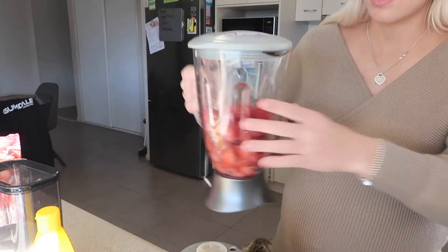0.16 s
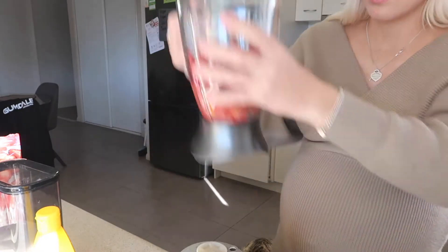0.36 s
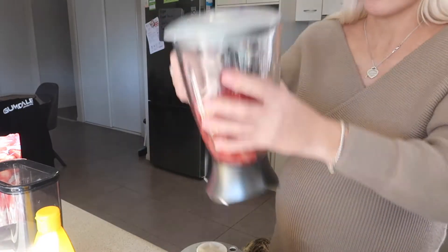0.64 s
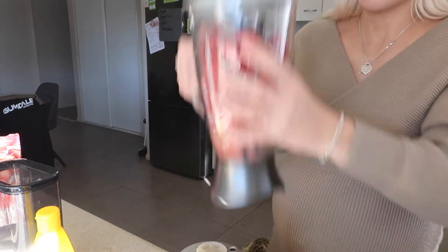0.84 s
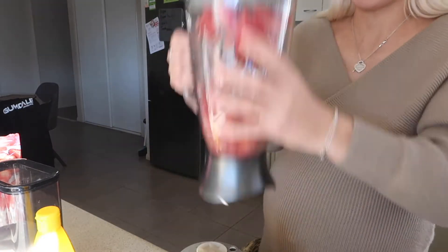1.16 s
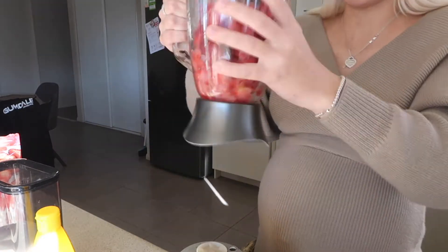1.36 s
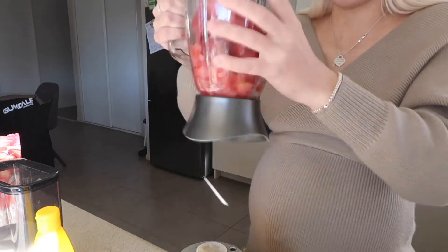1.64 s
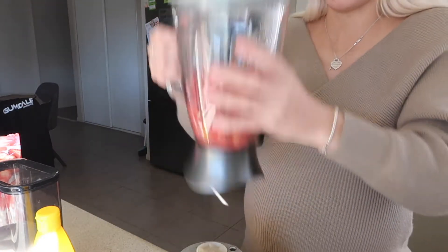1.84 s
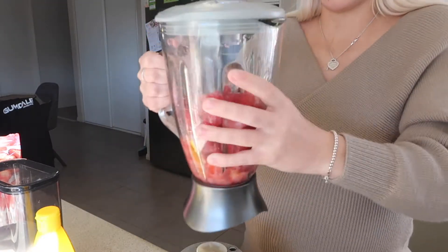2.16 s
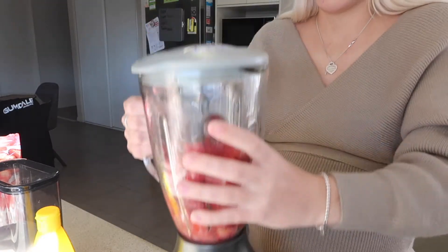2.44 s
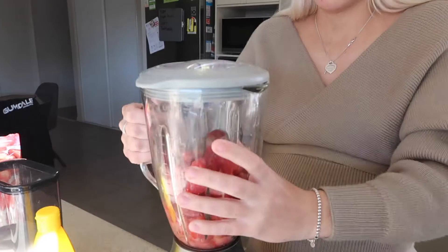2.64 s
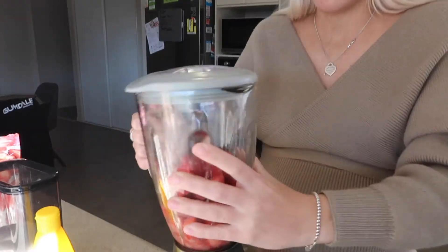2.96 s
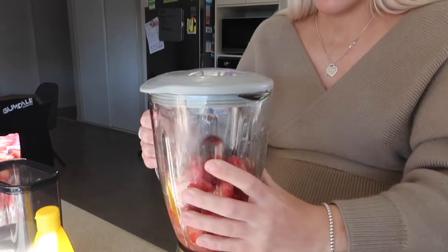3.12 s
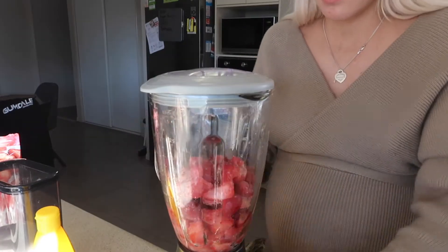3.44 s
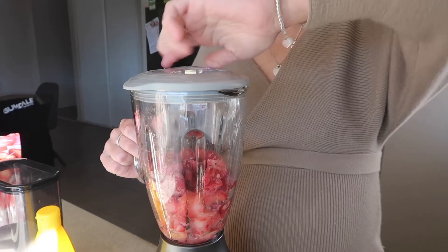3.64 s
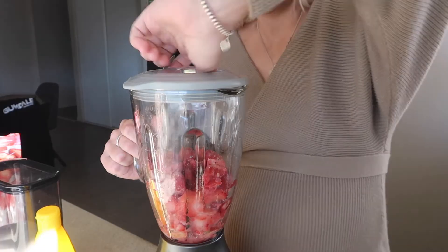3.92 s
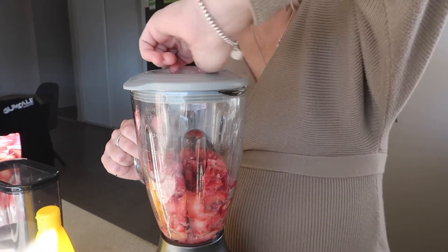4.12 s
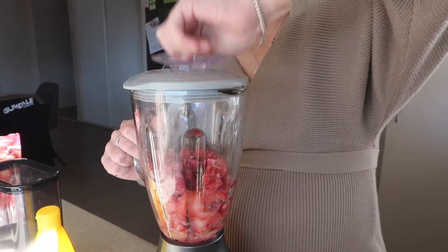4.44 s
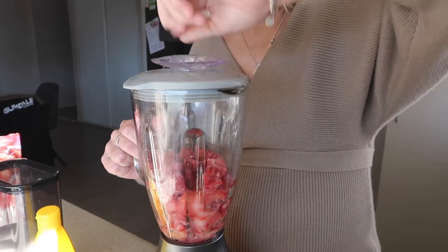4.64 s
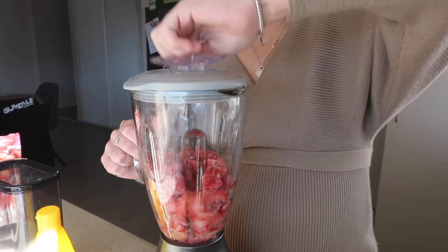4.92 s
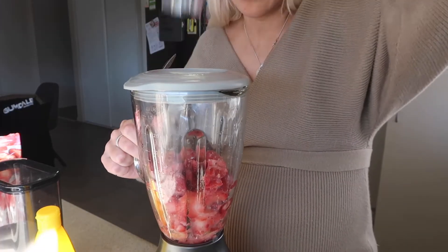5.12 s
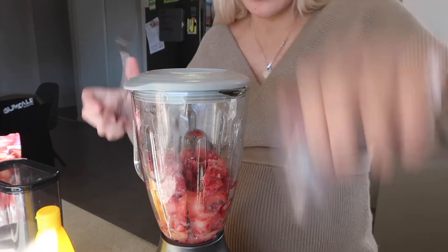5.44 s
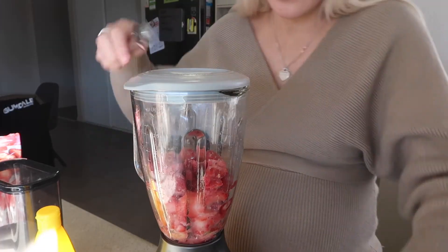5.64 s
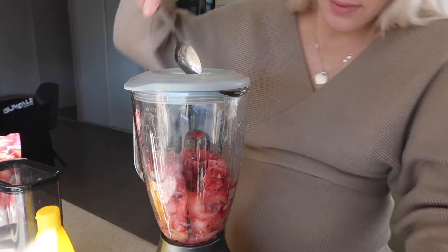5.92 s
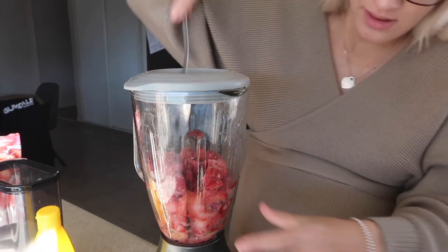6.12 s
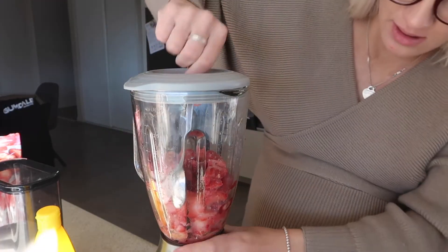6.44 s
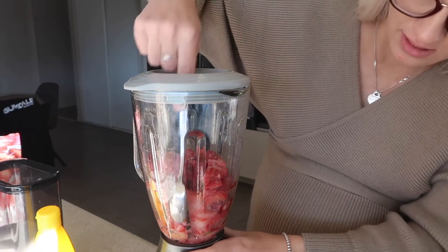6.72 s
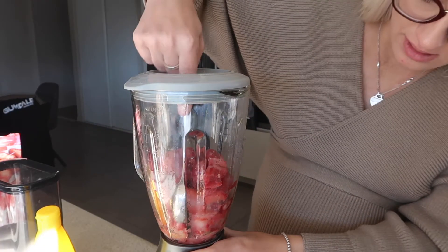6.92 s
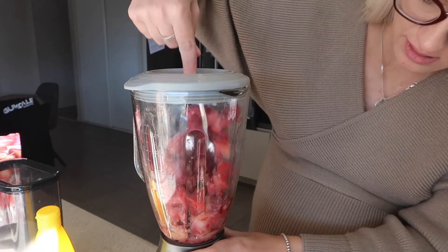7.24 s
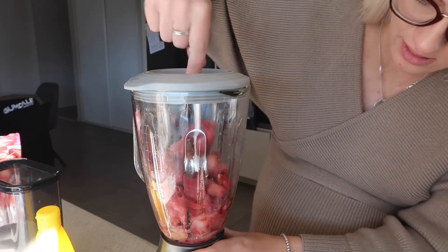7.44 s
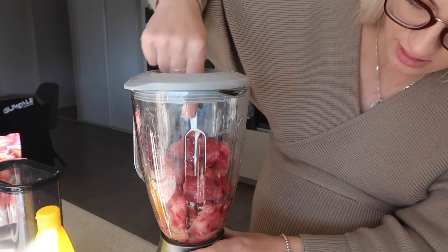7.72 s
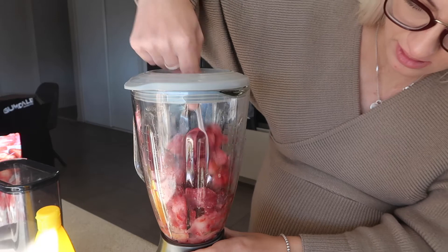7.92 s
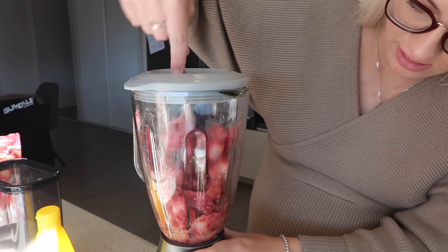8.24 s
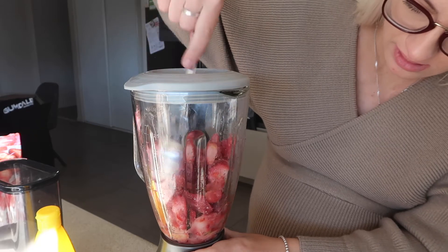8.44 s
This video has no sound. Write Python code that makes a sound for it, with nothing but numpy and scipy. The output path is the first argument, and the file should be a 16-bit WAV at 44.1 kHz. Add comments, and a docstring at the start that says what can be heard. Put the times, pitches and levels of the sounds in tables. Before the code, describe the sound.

A close stereo microphone hears icy lumps crunch and skid in a hollow glass jug, then a heavy double knock as it is seated. Dry plastic rasps and sharp snaps come next as the lid's cap is worked out. After a short pause, a metal spoon taps plastic, tumbles against glass with bright, quickening rattles, and later quietly stirs fruit, ending in thin clinks. Light room echo and faint hiss surround it.

```python
"""A glass blender jug of frozen fruit is shaken, then set down on its base in a kitchen.
The plastic cap is twisted out of the lid; a spoon drops through the hole, then pokes fruit and clinks on glass.
Blows are noisy cracks plus fading sine tones, rubbing is clumped grains of noise, slides are gritty noise.
Hum, rumble and hiss lie underneath, and fading noise makes the echoes of the room."""
import sys
import numpy as np
from scipy import signal
from scipy.fft import rfft, irfft, next_fast_len
from scipy.io import wavfile
from scipy.ndimage import uniform_filter1d

SR = 44100
rng = np.random.default_rng(int(sys.argv[2]) if len(sys.argv) > 2 else 0)


def wrap_up_sound(samples):
    """Save the sound to the file named by the first command line argument, as 16-bit audio."""
    columns = np.atleast_2d(samples).T
    # keep every value between -1 and 1, then stretch to whole-number steps
    tamed = np.clip(columns, -1, 1)
    steps = np.round(tamed * 32767).astype(np.int16)
    wavfile.write(sys.argv[1], SR, steps)


N = 378378
TIME = np.arange(N) / SR
CUTOFF_HZ = 15800   # nearly nothing is heard above this


# Sounds with two rows hold mid (straight ahead) and side (spread to left and right).
# In every table, t60 is the time a tone takes to fade by 60 dB.

def from_db(db):
    """Turn decibels into a gain."""
    return 10 ** (np.asarray(db) / 20)


def rms_one(x):
    """Scale to an rms (average strength) of one."""
    return x / np.sqrt(np.mean(x ** 2) + 1e-20)


def at_hz(points, hz):
    """Read a table between its points, on a logarithmic frequency axis."""
    f, value = np.transpose(points)
    return np.interp(np.log(np.maximum(hz, 1)), np.log(f), value)


def colour(x, points):
    """Make some pitches louder and others softer, along a smooth curve."""
    length = x.shape[-1]
    size = next_fast_len(length + 4096)
    gain = from_db(at_hz(points, np.fft.rfftfreq(size, 1 / SR)))
    return irfft(rfft(x, size) * gain, size)[..., :length]


def band(x, edges, order=2):
    """Keep only the pitches between two edges."""
    return signal.sosfilt(signal.butter(order, edges, "band", fs=SR, output="sos"), x)


def fade(t, t60):
    """Die away exponentially, 60 dB down after t60."""
    return np.exp(-np.log(1000) * t / t60)


def add(out, s, sound):
    """Mix a sound in at a time in seconds."""
    start = max(round(s * SR), 0)
    out[..., start:start + sound.shape[-1]] += sound[..., :max(N - start, 0)]


def grit(shape, depth_db, size=130):
    """Uneven gain of surfaces that catch and let go every few milliseconds."""
    wobble = rms_one(uniform_filter1d(rng.standard_normal(shape), size))
    return from_db(depth_db * np.clip(wobble, -2, 2))


def strokes_level(strokes):
    """Each stroke rises, holds and falls."""
    return sum(from_db(db) * np.interp(TIME, np.cumsum(stages), [0, 1, 1, 0]) for *stages, db in strokes)


def ringing(strikes, modes):
    """Each strike sets the same clear tones ringing, straight ahead."""
    out, t = np.zeros((2, N)), TIME[:SR]
    ring = sum(from_db(db) * np.sin(2 * np.pi * hz * t) * fade(t, t60) for hz, db, t60 in modes)
    for s, db, *_ in strikes:
        add(out[0], s, from_db(db) * ring)
    return out


# The four pitch ranges of a blow: thump, knock, clack and tick. Columns: lowest f/Hz, highest f/Hz.
# A blow's level is that of its clack over the first 20 ms, before any final colouring;
# its thump and knock are given against that level.
BLOW_BANDS = [(110, 600), (600, 1500), (1500, 4000), (4000, 12000)]


def blows(rows, modes, tick_db, tick_growth, crack_db, crack_t60, rattle_db, rattle_t60, scatter_db,
          build_cycles=0.25, contact_hz=600, hardening=0.22, detune=0, grip_db=0, grit_db=2,
          note_db=None, note_t60=None):
    """Each blow is a crack, a short uneven rattle of the body and its clear tones (modes)."""
    rows, t = np.array(rows), np.arange(int(.55 * SR), dtype=np.float32) / SR
    hz, level_db, t60 = np.array(modes).T[:, :, None]
    # a mode takes part of a cycle or more to build up, so the lows swell after the crack
    decays = from_db(level_db) * fade(t, t60) * (1 - np.exp(-hz * t / build_cycles))
    # while it still touches, the body loses grip_db of its ring; the rest dies freely
    decays = decays * from_db(grip_db * (fade(t, .15) - 1))

    # contact point and grip change from blow to blow, and with them each mode's strength, sign and pitch
    rings = []
    for strength, sign, bend in rng.standard_normal((len(rows), 3, 2, len(modes))):
        bent_hz = (hz * (1 + detune * bend[0][:, None])).astype(np.float32)
        shares = from_db(scatter_db * strength) * np.sign(sign)
        rings.append(shares @ (decays * np.sin(2 * np.pi * bent_hz * t)))

    # the harder the blow, the more of it goes into the crack
    times, clack_db, thump_db, knock_db, *notes_hz = rows.T
    force_db = clack_db - clack_db.mean()
    crack = from_db(crack_db + hardening * force_db)[:, None, None] * fade(t, crack_t60)
    rattle = from_db(rattle_db) * fade(t, rattle_t60) * grit((len(rows), 1, len(t)), grit_db)
    noise = rng.choice([-1, 1], (len(rows), 2, len(t)))
    raw = np.array(rings) + band((crack + rattle) * noise, [contact_hz, CUTOFF_HZ])

    # each contact point on the spoon brings out notes of its own
    for note_hz in notes_hz:
        note = from_db(note_db) * fade(t, note_t60) * np.sin(2 * np.pi * note_hz[:, None, None] * t)
        raw = raw + note * rng.choice([-1, 1], (len(rows), 2, 1))

    # force changes the share of the tick
    shares_db = [thump_db, knock_db, 0 * clack_db, tick_db + tick_growth * force_db]
    strengths_db = clack_db + np.array(shares_db)
    hits, out, attack = 0, np.zeros((2, N)), int(.02 * SR)
    for edges, strength_db in zip(BLOW_BANDS, strengths_db):
        part = band(raw, edges, order=3)
        loudness = part[..., :attack].std(axis=-1, keepdims=True)
        hits = hits + from_db(strength_db)[:, None, None] * part / loudness
    for s, hit in zip(times, hits):
        add(out, s, hit)
    return out


def friction(strokes, spectrum, level_db, per_s, spread_db, grain_t60, clump_db=4):
    """Many tiny contacts, each a short scratch; they come in clumps as things stick and slip."""
    sizes = (rng.random(N) < per_s / SR) * from_db(spread_db * np.minimum(rng.exponential(1, N), 3))
    clumps = rms_one(uniform_filter1d(rng.standard_normal(N), SR // 20))
    sizes = sizes * from_db(clump_db * clumps)
    grains = signal.fftconvolve(sizes, fade(TIME[:SR // 5], grain_t60))[:N]
    scratches = rms_one(colour(grains * rng.standard_normal((2, N)), spectrum))
    return from_db(level_db) * strokes_level(strokes) * scratches


def slides(rows, spectrum, grit_db, squeak_db, sharpness=7):
    """A short, gritty slide swells and stops, with a squeak at a pitch of its own."""
    out, t = np.zeros((2, N)), TIME[:SR // 4] - TIME[SR // 8]
    for s, db, half, hz in rows:
        scrape = rms_one(colour(rng.standard_normal((2, len(t))) * grit(len(t), grit_db), spectrum))
        peak = signal.iirpeak(hz, sharpness, fs=SR)
        squeak = rms_one(signal.lfilter(*peak, signal.lfilter(*peak, scrape)))   # sharpened twice
        swell = np.exp(-(t / half) ** 2)
        add(out, s + t[0], from_db(db) * swell * rms_one(scrape + from_db(squeak_db) * squeak))
    return out


START_HZ, SAG_HZ, SAG_AT_S, SAG_S = 133.5, 21.78, 1, 0.175   # pitch, its drop, when and how gradually
START_DB, FADE_DB_PER_S, HUM_END_S = -42.5, 3.5, 2.53


def hum(release_s=0.77):
    """A low sine tone sinks in pitch and fades, ending just before the jug is set down."""
    hz = START_HZ - SAG_HZ / (1 + np.exp((SAG_AT_S - TIME) / SAG_S))
    level = from_db(START_DB - FADE_DB_PER_S * TIME) * np.clip((HUM_END_S - TIME) / release_s, 0, 1)
    return np.sqrt(2) * level * np.sin(2 * np.pi * np.cumsum(hz) / SR)


# Low rumble while the jug is carried, settled, held and poked.
# Columns: start t/s, rise t/s, hold t/s, fall t/s, level/dB.
RUMBLE_STROKES = [(-.4, 0.93, 1.41, 0.92, -42.5), (2.55, 0.064, 0.39, 0.35, -37),
                  (3.605, 0.015, 0.03, 0.052, -47.5), (7.05, 0.045, 1.16, 0.38, -56)]
# Tone of the rumble. Columns: f/Hz, level/dB.
RUMBLE_TONE = [(20, -15), (40, 7.5), (70, 4.5), (130, 3.5), (200, -1), (400, -41.5), (900, -81.5)]


def rumble(handling, jolt_db=-30.5, jolt_t60=0.49):
    """Low noise follows the handling and swells after each jolt."""
    tail = fade(TIME[:SR], jolt_t60) ** 2
    jolts = np.sqrt(np.abs(signal.fftconvolve(handling ** 2, tail / tail.sum())[:N]))
    noise = rms_one(colour(rng.standard_normal((2, N)), RUMBLE_TONE))
    return (strokes_level(RUMBLE_STROKES) + from_db(jolt_db) * jolts) * noise


# Tone of the still kitchen. Columns: f/Hz, level/dB.
AIR_TONE = [(40, 3.5), (80, 3.5), (250, 4), (500, 1.5), (1000, -5.5), (2400, -7), (6000, -18),
            (13000, -30.5), (15000, -53)]


def air(hiss_db=-54.5, whine_hz=12980, whine_db=-83):
    """Faint hiss of the still kitchen (noise), with a thin electrical whine (a sine tone)."""
    hiss = from_db(hiss_db) * rms_one(colour(rng.standard_normal((2, N)), AIR_TONE))
    whine = np.sqrt(2) * from_db(whine_db) * np.sin(2 * np.pi * whine_hz * TIME)
    return hiss + np.outer([1, 0], whine)


def suppression(sound, threshold_db=-21, ratio=0.77, recover_db_per_s=6.5, attack_s=0.14):
    """Gain of a noise suppressor: loud sounds push the steady hiss down, and it creeps back."""
    power = uniform_filter1d(sound ** 2, SR // 25)
    level_db = 10 * np.log10(np.maximum(power, 1e-12))
    push_db = ratio * np.maximum(level_db - threshold_db, 0)
    # the deepest push so far holds, less what has come back since
    recovery_db = recover_db_per_s * TIME
    held_db = np.maximum.accumulate(push_db + recovery_db) - recovery_db
    pole = np.exp(-1 / (attack_s * SR))
    return from_db(-signal.lfilter([1 - pole], [1, -pole], held_db))


# Icy pieces rub and shift. Columns: start t/s, rise t/s, hold t/s, fall t/s, level/dB (before level_db).
SHUFFLE_STROKES = [(.25, 0.44, 0.34, 1.51, -45), (7.05, 0.23, 1.13, 0.085, -50.5)]
# Tone of the shuffling. Columns: f/Hz, level/dB.
SHUFFLE_TONE = [(100, 5), (300, 7.5), (600, 2.5), (1000, 2.5), (1500, -4), (2900, -4.5), (4400, -12),
                (5100, -10.5), (7000, -24.5), (14000, -39.5)]


def shuffle():
    """Icy pieces rub and shift: sparse, clumped grains of noise."""
    return friction(SHUFFLE_STROKES, SHUFFLE_TONE, level_db=-3, per_s=150, spread_db=5, grain_t60=0.054)


# How long echoes last. Columns: f/Hz, t60/s.
ECHO_T60 = [(100, 0.17), (400, 0.54), (2000, 0.52), (5000, 0.41), (14000, 0.081)]
# How loud echoes are against the direct sound. Columns: f/Hz, level/dB.
ECHO_LEVEL = [(100, -15), (400, -7), (1000, -6.5), (2500, -14.5), (6000, -6.5), (14000, -43)]


def kitchen(x, first_echo_s=0.0028):
    """Diffuse echoes, made of fading noise, die at their own pace in each band of pitches."""
    t, response = TIME[:SR], 0
    edges = np.geomspace(70, 17000, 9)
    for low, high in zip(edges, edges[1:]):
        hz = np.sqrt(low * high)
        # silent until first_echo_s, then fading in over as long again
        envelope = fade(t, at_hz(ECHO_T60, hz)) * np.clip(t / first_echo_s - 1, 0, 1)
        envelope = envelope / np.linalg.norm(envelope) * from_db(at_hz(ECHO_LEVEL, hz))
        response = response + envelope * band(rng.standard_normal((2, len(t))), [low, high])
    return signal.fftconvolve(x, response, axes=-1)[:, :N]


# Frozen pieces skid along the glass; at 2.93 and 3.14 s the jug scrapes as it settles on its base.
# Columns: peak t/s, level/dB, half length t/s, squeak f/Hz.
SKIDS_AND_SCRAPES = [(.669, -31.5, 0.016, 2470), (.975, -35, 0.012, 3040), (1.272, -37.5, 0.03, 2490),
                     (1.757, -33, 0.0058, 2840), (1.841, -30.5, .0051, 3080), (2.93, -42.5, 0.078, 1875),
                     (3.14, -50.5, 0.055, 2190), (1.04, -54, 0.077, 3670), (6.757, -49, 0.0074, 3430),
                     (7.755, -46, 0.029, 3500), (7.786, -40, 0.021, 1930), (8.175, -52.5, 0.026, 960)]
# Tone of the skids and scrapes. Columns: f/Hz, level/dB.
SKID_TONE = [(300, -2), (900, 5.5), (1700, 2.5), (2900, 1), (4000, -13), (7000, -26.5), (14000, -72)]


def skids_and_scrapes():
    """Frozen pieces skid along the glass and the settling jug scrapes: very gritty noise with a squeak."""
    return slides(SKIDS_AND_SCRAPES, SKID_TONE, grit_db=5.5, squeak_db=-3)


# Lumps of fruit land at each shake or poke. Columns: t/s, level/dB, thump/dB, knock/dB.
FRUIT_LANDINGS = [(.891, -44, 5, 0), (.932, -47, 10, -12), (.984, -29.5, -21, -7.5),
                  (1.204, -41.5, 15.5, -5), (1.222, -35.5, 8.5, -1.5), (1.256, -36.5, -7, -2),
                  (1.315, -36.5, -3, -5), (1.337, -44.5, -1.5, 0), (1.531, -40.5, 14, -5.5),
                  (1.553, -40.5, 7, -4), (1.59, -45, 1.5, 1.5), (1.625, -42, -23, 0),
                  (1.7786, -28, 7.5, 0.5), (1.872, -41, 4, 5.5), (1.893, -48.5, -2, 7),
                  (2.195, -45.5, -2.5, 2), (7.135, -71, 10, -6.5), (7.274, -53.5, 2.5, 1),
                  (7.332, -39.5, -5.5, -3), (7.562, -52, -1.5, 2.5), (7.687, -38, 4, -5.5),
                  (8.123, -60, 9, 7), (8.234, -53, -6, -28)]
# The jug with its load of fruit. Columns: f/Hz, level/dB, t60/s.
HEAP = [(155.4, -9, 0.12)]
# The air in the jug, also woken by other blows. Columns: f/Hz, level/dB, t60/s.
JUG_AIR = [(230.4, 0, 0.073), (269.7, -7.5, 0.17), (344.2, 4.5, 0.19), (385, -4, 0.098), (460, -5.5, 0.07)]
# Ring of the jug itself. Columns: f/Hz, level/dB, t60/s.
JUG_BODY = [(909, -4, 0.048), (1148, -5.5, 0.061), (2890, -5, 0.061)]
# A hard lump meets bare glass. Columns: t/s, level/dB.
LUMP_PINGS = [(1.337, -50), (1.59, -51), (1.625, -51), (1.872, -51), (7.562, -53), (7.615, -69),
              (8.17, -70)]
# Ring of the bare glass. Columns: f/Hz, level/dB, t60/s.
BARE_GLASS = [(1093, 17.5, 0.17), (5160, 6.5, 0.073)]


def fruit():
    """Frozen lumps land with a dull crunch, wake the air in the jug and sometimes ping the glass."""
    knocks = blows(FRUIT_LANDINGS, HEAP + JUG_AIR + JUG_BODY, tick_db=-9, tick_growth=-0.23,
                   crack_db=-3, crack_t60=0.025, rattle_db=-1, rattle_t60=0.13, scatter_db=5,
                   build_cycles=0.17, detune=.04, grit_db=3.5)
    dull = [(200, 3), (1000, 5), (5000, -5), (8000, -11.5), (14000, -29)]
    return colour(knocks, dull) + ringing(LUMP_PINGS, BARE_GLASS)


# The jug lands on the base and rocks into place.
# Columns: t/s, level/dB, thump/dB, boom of the counter/dB.
JUG_LANDINGS = [(2.5526, -18, -0.5, -7.5), (2.5939, -17, -10, -35), (2.883, -44.5, -7, -43),
                (2.903, -37, -2, -15.5), (2.983, -61, 20, -25), (3.106, -52, 7.5, -19),
                (3.129, -46, 5.5, -35), (3.588, -48.5, -7, -34.5)]
# Ring of the plastic base. Columns: f/Hz, level/dB, t60/s.
PLASTIC_BASE = [(1190, -6, 0.036), (2010, -11, 0.023), (2524, 1, 0.0087), (3300, -13.5, 0.011)]
# Hollow note of the jug, and its steel parts that ring on. Columns: f/Hz, level/dB, t60/s.
SEATED_JUG = [(334.6, 9, 0.19), (6450, -55, 1.8), (7330, -42.5, 1.1)]


def jug_on_base(knock_db=-12):
    """Glass meets the plastic base with a hard clack, and the seated jug rings on."""
    rows = [(s, db, thump_db, knock_db) for s, db, thump_db, _ in JUG_LANDINGS]
    clacks = blows(rows, HEAP + JUG_AIR + PLASTIC_BASE, tick_db=-17, tick_growth=0.86,
                   crack_db=0.5, crack_t60=0.00092, rattle_db=4.5, rattle_t60=0.031, scatter_db=5.5,
                   build_cycles=1)
    dark = [(200, 3.5), (2500, 1), (4000, -6), (8000, -30), (14000, -51)]
    return colour(clacks, dark) + ringing(JUG_LANDINGS, SEATED_JUG)


# Boom of the counter. Columns: f/Hz, level/dB, t60/s.
COUNTER_TONES = [(53.7, -0.5, 0.47), (96.3, -4, 0.37)]


def counter(lag_s=0.0042):
    """The weight of the landing jug sets the counter booming in two low tones."""
    out, t = np.zeros((2, N)), np.arange(SR // 2) / SR
    tones = sum(from_db(db) * np.sin(2 * np.pi * hz * t) * fade(t, t60) for hz, db, t60 in COUNTER_TONES)
    boom = (1 - fade(t, 0.011)) * tones   # rubber feet soften the push
    for s, _, _, boom_db in JUG_LANDINGS:
        add(out, s + lag_s, from_db(boom_db) * boom)
    return out


# Fingers and cap rub on the lid.
# Columns: start t/s, rise t/s, hold t/s, fall t/s, level/dB (before level_db).
RUB_STROKES = [(3.478, 0.015, 0.0067, 0.061, -52), (3.572, 0.012, 0.27, 0.1, -53),
               (3.9, .1, 0.71, 0.9, -51.5)]
# Tone of the rubbing. Columns: f/Hz, level/dB.
RUB_TONE = [(200, -3), (450, 2.5), (900, 0), (1700, 11.5), (2800, 12), (5000, -3.5), (9000, -21),
            (14000, -48)]


def rub():
    """Fingers and cap rub on the lid: dense, fairly even grains of noise."""
    return friction(RUB_STROKES, RUB_TONE, level_db=3, per_s=700, spread_db=3, grain_t60=0.08, clump_db=1)


# The cap scratches and rasps as it turns. Columns: peak t/s, level/dB, half length t/s, squeak f/Hz.
CAP_RASPS = [(3.816, -35.5, .004, 1480), (3.902, -32, 0.0018, 3200), (4.042, -18, 0.0097, 2420),
             (4.241, -35.5, 0.006, 2380), (4.319, -35, 0.0061, 2500), (5.078, -37.5, .009, 4130)]
# Tone of the rasps. Columns: f/Hz, level/dB.
RASP_TONE = [(500, -1), (1200, 5), (2200, 11.5), (4000, 5.5), (8000, -10), (14000, -29)]


def rasps():
    """The cap scratches as it turns: slightly gritty noise with a faint squeak."""
    return slides(CAP_RASPS, RASP_TONE, grit_db=1, squeak_db=-5)


# The cap taps, catches and snaps as it is worked out of the lid.
# Columns: t/s, level/dB, thump/dB, knock/dB.
CAP_SNAPS = [(3.9405, -33, -18, -11.5), (4.038, -22.5, -30, -14), (4.333, -23.5, -2.5, -1),
             (4.3428, -16, -10, -5), (4.525, -14.5, -8, -8.5), (4.5305, -28, -3.5, -8.5),
             (4.632, -35, -0.5, -9.5), (4.648, -32.5, 3.5, 0), (4.758, -29, 4.5, -9),
             (4.7655, -18, -9, -7.5), (4.794, -28.5, 2, -2), (4.99, -32.5, -2, -9.5),
             (5.002, -21.5, -5, -2.5), (5.034, -35.5, 8.5, 3.5)]
# Ring of the plastic lid. Columns: f/Hz, level/dB, t60/s.
LID_BODY = [(1088, 1, 0.06), (1674, -3, 0.038), (2117, -16.5, 0.025), (2330, 8.5, 0.019), (2720, -5, 0.042)]


def lid():
    """Plastic snaps are over in a few milliseconds and creak as they settle; the hollow jug answers."""
    snaps = blows(CAP_SNAPS, JUG_AIR + LID_BODY, tick_db=-1.5, tick_growth=0.26,
                  crack_db=20, crack_t60=0.007, rattle_db=6.5, rattle_t60=0.11, scatter_db=4,
                  hardening=0.5, detune=0.06, grit_db=2)
    tone = [(140, 9), (280, -8), (450, 6.5), (700, -3.5), (1600, 3), (4500, -10), (8000, -26), (14000, -42)]
    return colour(snaps, tone)


# The jug's air note falls as the hole in the lid is covered. Columns: t/s, starting f/Hz, level/dB.
AIR_GULPS = [(5.086, 309.5, -22.5), (5.938, 385.4, -7.5), (7.33, 393, -19), (7.7, 325, -22)]


def gulps(fall_share=0.36, fall_s=0.045, attack_s=0.011, t60=0.16):
    """A hollow sine note swells, sinks in pitch and dies away."""
    out, t = np.zeros((2, N)), TIME[:SR // 3]
    envelope = (1 - np.exp(-t / attack_s)) * fade(t, t60)
    bend = 1 - fall_share * (1 - np.exp(-t / fall_s))
    for s, hz, db in AIR_GULPS:
        add(out[0], s, from_db(db) * envelope * np.sin(2 * np.pi * np.cumsum(hz * bend) / SR))
    return out


# The spoon knocks on the rim of the hole. Columns: t/s, level/dB, thump/dB, knock/dB.
RIM_KNOCKS = [(5.8365, -15.5, -4, -5.5), (5.9375, -25.5, 3.5, -16)]


def spoon_on_lid():
    """A dry knock on plastic, under which the air in the jug swells."""
    knocks = blows(RIM_KNOCKS, JUG_AIR + LID_BODY, tick_db=-9, tick_growth=.1,
                   crack_db=23, crack_t60=0.009, rattle_db=14, rattle_t60=0.1, scatter_db=4,
                   build_cycles=1.3, detune=0.026)
    tone = [(140, -20.5), (300, -3.5), (1000, 5.5), (2200, 0),
            (3200, -2.5), (5500, -7.5), (8000, -15), (14000, -53)]
    return colour(knocks, tone)


def bounces(s, db, thump_db, knock_db, loss_db, note_hz, count, gap_s=0.015, shrink=0.73):
    """An uneven run of touches, each weaker and mostly sooner than the last, as rows of blows."""
    k = np.arange(count)
    gaps = gap_s * shrink ** k * from_db(2 * rng.standard_normal(count))   # seconds, unevenly shrinking
    delays = np.cumsum(gaps) - gaps
    return [(s + delay, db - loss, thump_db, knock_db, note_hz) for delay, loss in zip(delays, loss_db * k)]


# The spoon drops into the jug and bounces. Columns: t/s, level/dB, thump/dB, knock/dB, note f/Hz.
SPOON_BOUNCES = [(6.066, -17.5, 2, 1.5, 2230), (6.1117, -11.5, -8.5, -20, 3300), (6.17, -26.5, 3, -8, 1420),
                 (6.196, -24.5, 0, -1, 2190), (6.268, -28.5, -7.5, -3, 1400), (6.278, -8, -30.5, -10, 1900),
                 (6.352, -25, -6.5, -0.5, 1960), (6.3737, -22.5, -20.5, -7, 3110),
                 (6.545, -36.5, -25, -11.5, 3720)]
# Between bounces the spoon rattles, mostly faster and faster.
# Columns: t/s, level/dB, thump/dB, knock/dB, loss per touch/dB, note f/Hz.
RATTLE_RUNS = [(6.215, -30, 0, 6.5, 1.2, 1423), (6.39, -26, -11, -2.5, 1.5, 2050)]
# The loose spoon and the jug ring together. Columns: f/Hz, level/dB, t60/s.
SPOON_AND_JUG = [(735, -5.5, 0.12), (994, 0.5, .2), (1386, -18, 0.25), (1690, -8.5, 0.15), (1880, -2, .2),
                 (2056, -10, 0.19), (2180, 2.5, 0.34), (3075, -3, 0.33), (3100, -4.5, 0.12),
                 (4050, -17.5, .09), (5220, -8, .13), (6530, -6, .11)]


def dropped_spoon():
    """The spoon falls through the lid, clatters between glass and fruit and settles."""
    rows = list(SPOON_BOUNCES)
    for run in RATTLE_RUNS:
        rows += bounces(*run, count=6)
    # the rattle is the grit of steel on glass, the note belongs to the contact point
    clatter = blows(rows, SPOON_AND_JUG, tick_db=-12, tick_growth=0.25,
                    crack_db=8, crack_t60=0.017, rattle_db=-2.5, rattle_t60=0.22, scatter_db=5.5,
                    contact_hz=193, detune=0.0061, grip_db=14, grit_db=5, note_db=6, note_t60=0.044)
    tone = [(200, -3.5), (1000, 1), (3000, -1.5), (4000, -7), (8000, -16), (14000, -42)]
    return colour(clatter, tone)


# Spoon against the jug wall.
# Columns: t/s, level/dB, thump/dB, knock/dB, low note f/Hz, high note f/Hz.
SPOON_CLINKS = [(8.4045, -30, 0.5, 4.5, 1576, 10660), (8.4445, -31, -6, 3, 2520, 3760),
                (8.5332, -39, -25, -19, 4350, 6250), (8.5502, -31.5, -2, -1, 2480, 4500)]
# Ring of a clink. Columns: f/Hz, level/dB, t60/s.
CLINK_TONES = [(347, 4, 0.24), (1063, 21.5, 0.052), (2700, 7, 0.036), (5140, 24.5, 0.034), (5740, 8, .025),
               (6170, 8.5, 0.066), (9600, 0, 0.36), (12230, 7, 0.29), (12700, -8, 0.088)]


def spoon():
    """Steel strikes the glass, which the fruit damps; each contact point brings out other spoon notes."""
    clinks = blows(SPOON_CLINKS, CLINK_TONES, tick_db=4.5, tick_growth=0.11,
                   crack_db=3, crack_t60=0.026, rattle_db=3, rattle_t60=0.17, scatter_db=4,
                   hardening=0.034, detune=0.016, grip_db=10, note_db=15, note_t60=0.035)
    bright = [(300, -14.5), (3000, 11), (5000, 4), (7500, 3.5), (11000, -8.5), (15000, 3)]
    return colour(clinks, bright)


# Width of the direct sound: narrow in the lows and middle, wide in the top treble.
# Columns: f/Hz, level of the side/dB.
DIRECT_WIDTH = [(1200, -20.5), (3000, -8.5), (7000, -2), (13000, 5)]
# Overall width. Columns: f/Hz, level of side against mid/dB.
STEREO_WIDTH = [(60, -62), (150, -26.5), (380, -23), (700, -15.5), (1290, -10.5), (2380, -9), (4400, -2.5),
                (8120, 2.5), (15000, 11.5)]


def scene():
    """All happens straight ahead; only the treble spreads wide."""
    direct = shuffle() + skids_and_scrapes() + fruit() + jug_on_base()
    direct = direct + rub() + rasps() + lid() + gulps()
    direct = direct + spoon_on_lid() + dropped_spoon() + spoon()
    ahead = np.array([direct[0], colour(direct[1], DIRECT_WIDTH)])
    sound = ahead + kitchen(direct) + counter() + rumble(direct[0])
    sound = sound + hum()   # the same in mid and side
    mid, side = sound + air() * suppression(sound[0])
    side = colour(side, STEREO_WIDTH)
    return np.array([mid + side, mid - side])


def record(dry):
    """The deepest bass is shed, the hardest blows overload, the top is cut."""
    thinned = signal.sosfilt(signal.butter(2, 32, "high", fs=SR, output="sos"), dry)
    overloaded = np.clip(thinned, -1, 1)
    return signal.sosfilt(signal.ellip(10, .1, 80, CUTOFF_HZ, fs=SR, output="sos"), overloaded)


dry = scene()
out = record(dry)
wrap_up_sound(out)
```